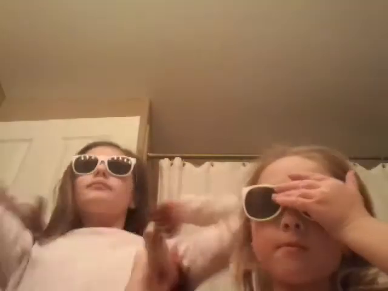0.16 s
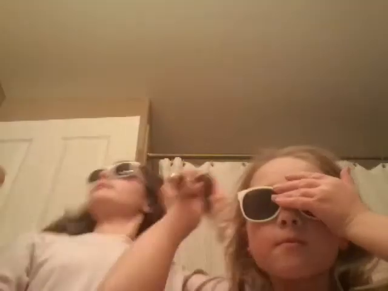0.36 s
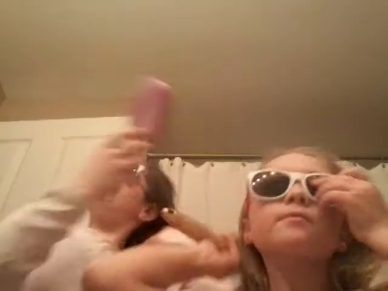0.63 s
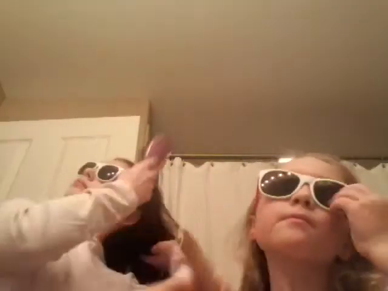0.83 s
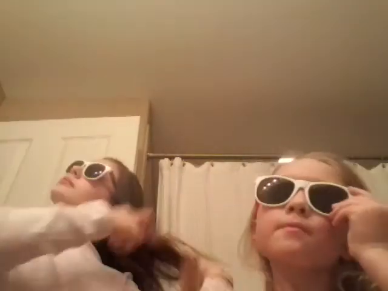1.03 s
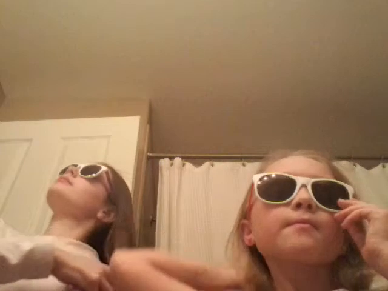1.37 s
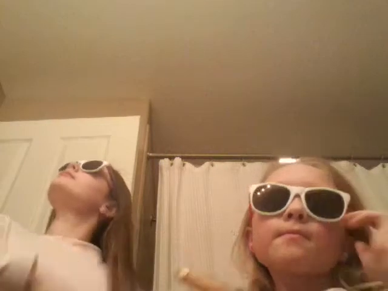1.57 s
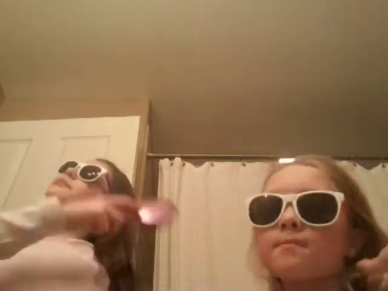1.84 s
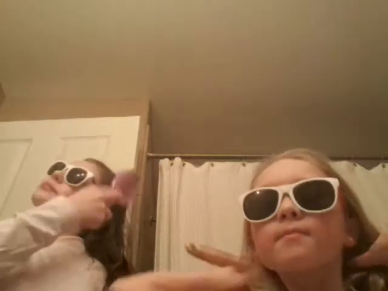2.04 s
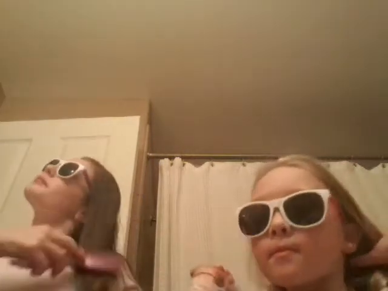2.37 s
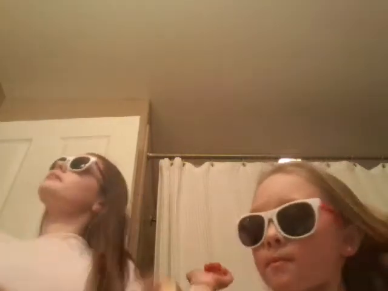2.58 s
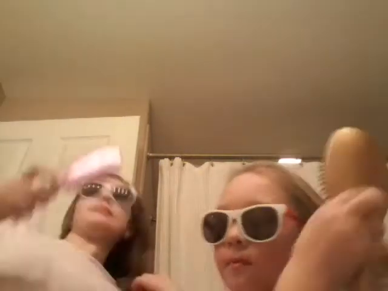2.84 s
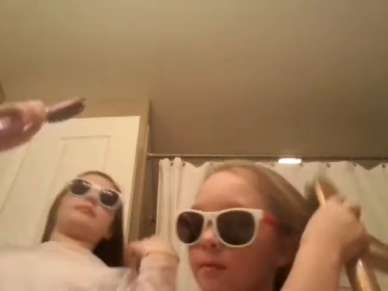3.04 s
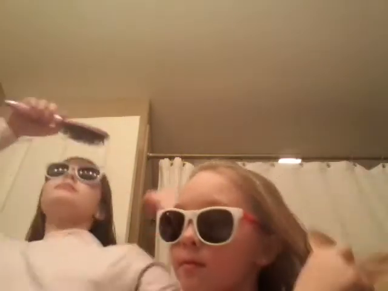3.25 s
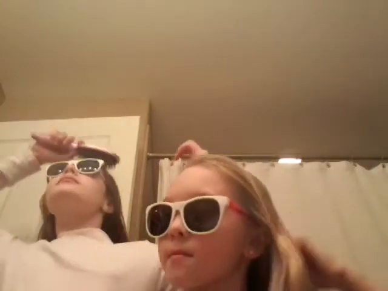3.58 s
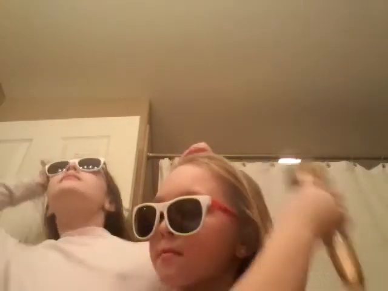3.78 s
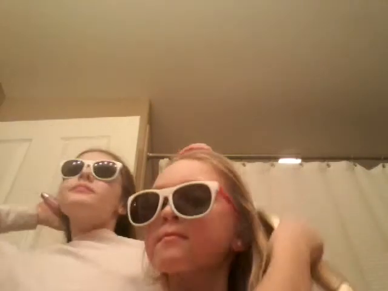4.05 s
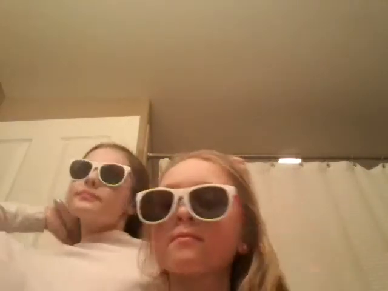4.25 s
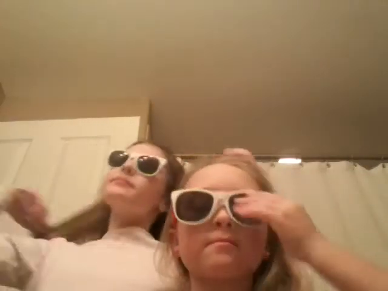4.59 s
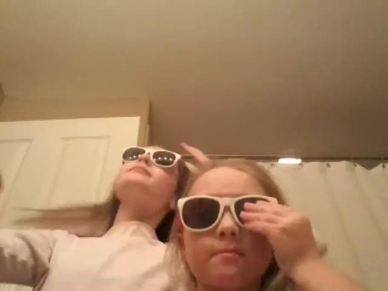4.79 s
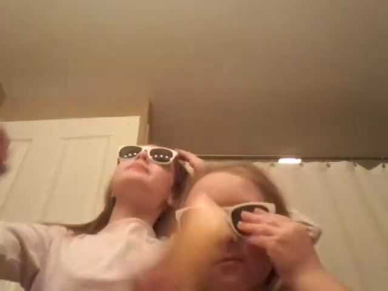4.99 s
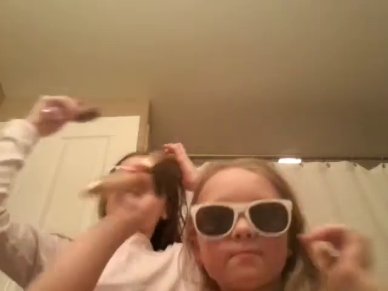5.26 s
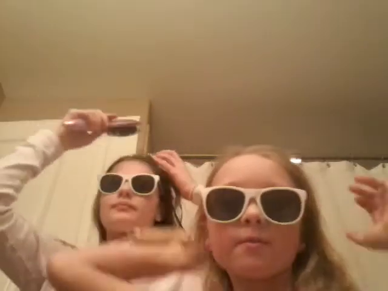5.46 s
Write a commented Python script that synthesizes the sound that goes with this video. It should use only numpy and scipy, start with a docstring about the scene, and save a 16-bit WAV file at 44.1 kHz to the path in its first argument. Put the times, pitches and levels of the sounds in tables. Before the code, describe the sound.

In a small hard-walled bathroom, a hollow bump opens abruptly, followed by hissing brush strokes, sharp bristle ticks and a crackly burst. Sleeves rub and handles knock close to a small built-in microphone. A hard plastic snap echoes, then strokes grow quieter until a second rattling bump. It ends in faint brushing over a low fan hum.

```python
"""In a small hard-walled bathroom, two people brush their hair close to a small built-in microphone.
Bristle slips, made of dense random clicks, hiss through the hair and ring hollow brush backs; sleeves rub.
Single bristles snag and tick, hands and handles knock softly: short decaying rings with noise around them.
A brush snaps once against something hard and the counter is bumped twice: noise bursts, rings and room echo.
A fan hums faintly: a wavering sine over coloured noise."""
import sys
import numpy as np
from scipy import signal
from scipy.fft import rfft, irfft
from scipy.io import wavfile

SR = 44100
rng = np.random.default_rng(int(sys.argv[2]) if len(sys.argv) > 2 else 0)


def wav_out(sig):
    """Save sig, one row per channel (or a flat mono array), as 16-bit PCM at SR to the path in sys.argv[1]."""
    wavfile.write(sys.argv[1], SR, np.round(np.clip(np.atleast_2d(sig).T, -1, 1) * 32767).astype(np.int16))


N = 248711

# The tones in which the counter and room ring. Each row: pitch in Hz, time to die away by 60 dB in seconds,
# relative level in dB in the first bump, relative level in dB in the second bump.
COUNTER_MODES = [(94.4, 0.54, -17, -14.5), (59.6, 0.89, -26, -41), (121.56, 0.34, 4, -8),
                 (127.4, 0.57, 0, -14.5), (193.1, 0.37, -14, -1), (210, 0.54, -8, -10.5),
                 (256.4, .4, -8, -7), (295.4, 0.49, -17, -17.5), (304.6, 0.45, -8.5, -7),
                 (377.5, 0.33, -6.5, -2.5), (472, 0.34, -36, -16.5), (466, .33, -9, -5.5),
                 (555, 0.16, -14, -6), (601, 0.17, -17, -7), (772, 0.23, -21.5, -17)]


def amp(db):
    """Turn dB into a plain gain."""
    return 10 ** (np.asarray(db) / 20)


def rms_one(x):
    """Scale a signal to an average strength (rms) of 1."""
    return x / np.sqrt(np.mean(x ** 2) + 1e-20)


def at_hz(points, hz):
    """Read a table of (Hz, value) between its points, on a log-frequency axis."""
    table_hz, values = np.transpose(points)
    return np.interp(np.log(hz), np.log(table_hz), values)


def drift(rate_hz):
    """Slow random wander of rms 1: noise smoothed by two equal poles, worked out every 40 samples."""
    pole = np.exp(-80 * np.pi * rate_hz / SR)
    noise = rng.standard_normal(N // 40 + 2002)
    slow = signal.lfilter([1], [1, -2 * pole, pole * pole], noise)[2000:]  # skip the filter's start
    return np.interp(np.arange(N) / 40, np.arange(len(slow)), rms_one(slow))


def colour(x, spectrum):
    """Weight each frequency of a signal by a spectrum table, then scale to rms 1."""
    hz = np.maximum(np.fft.rfftfreq(len(x), 1 / SR), 1)
    return rms_one(irfft(rfft(x) * amp(at_hz(spectrum, hz)), len(x)))


def grains(per_s, spread_db):
    """Many tiny clicks at random moments and of uneven size, like bristles slipping; rms 1."""
    boost_db = spread_db * np.minimum(rng.exponential(1, N), 5)
    sizes = amp(boost_db) * rng.standard_normal(N)
    return rms_one(sizes * (rng.random(N) < per_s / SR))


def resonate(x, hz, width_hz):
    """Pass a signal through one resonance, with gain 1 at its peak."""
    return signal.lfilter(*signal.iirpeak(hz, hz / width_hz, fs=SR), x)


def ring(hz, t60, size, rise=0.00017, hold=0.):
    """One struck tone: a sine of height about 1 that rises fast, may be held, then dies away evenly in dB."""
    t = np.arange(size) / SR
    decay = amp(-60 * np.maximum(t - hold, 0) / t60)
    return np.sin(2 * np.pi * hz * t) * decay * (1 - np.exp(-t / rise))


def echo_tail(spectrum, size, rise, hold=0.):
    """Blurred room echo: noise in third-octave bands, each dying at the room's rate; rms about 1 before decay."""
    # How long the room echoes. Each row: frequency in Hz, time to die away by 60 dB in seconds.
    room_t60 = [(40, 0.78), (120, 0.51), (260, 0.44), (700, 0.38), (1840, 0.34), (4850, 0.26),
                (12800, 0.22)]
    t = np.arange(size) / SR
    hz = np.maximum(np.fft.rfftfreq(size, 1 / SR), 1)
    noise = rfft(colour(rng.standard_normal(size), spectrum))
    out = np.zeros(size)
    for centre in 30 * 2 ** np.arange(0, 9.4, 1 / 3):
        share = np.clip(1 - np.abs(3 * np.log2(hz / centre)), 0, 1)  # neighbouring bands overlap
        decay = amp(-60 * np.maximum(t - hold, 0) / at_hz(room_t60, centre))
        out += irfft(noise * share, size) * decay
    return out * (1 - np.exp(-t / rise))


def add(out, s, x):
    """Mix x into out, starting at s seconds."""
    i = round(s * SR)
    out[i:i + len(x)] += x[:N - i]


def swells(rows):
    """Rise to each row's loudest moment and fall again, evenly in dB; powers add. One gain per level column."""
    fade_db = 20  # rise and fall times are counted over this many dB
    t = np.arange(0, N + 64, 64) / SR
    s, rise, fall, *levels_db = np.transpose(rows)[:, :, None]
    shape = amp(-fade_db * np.maximum((s - t) / rise, (t - s) / fall))
    gains = []
    for db in levels_db:
        total = np.sqrt(np.sum((amp(db) * shape) ** 2, axis=0))
        gains.append(np.interp(np.arange(N) / SR, t, total))
    return gains


def background():
    """Fan air and microphone hiss as coloured noise, plus a motor hum that wavers in pitch and level."""
    # Overall level, sinking throughout. Each row: time in seconds, level in dB.
    level_curve = [(0, -57.5), (1.5, -61), (4.2, -63), (4.8, -65), (5.64, -66)]
    # Colour of fan air and microphone hiss. Each row: frequency in Hz, relative level in dB.
    air_colour = [(12, -26.5), (20, -10), (49, -16), (100, -4.5), (122, -0.5), (175, -12), (427, -16),
                  (580, -12.5), (685, -10), (809, -13.5), (930, -16), (2330, -18), (3640, -16.5),
                  (15400, -26)]
    hum_hz, hum_db, hum_waver_db = 121.7, -1, 1  # hum height is relative to the rms of the air
    pitch_hz = hum_hz + 0.47 * drift(3.4)
    hum = np.sin(2 * np.pi * np.cumsum(pitch_hz) / SR) * amp(hum_db + hum_waver_db * drift(5))
    air = colour(rng.standard_normal(N), air_colour)
    times, levels_db = np.transpose(level_curve)
    return amp(np.interp(np.arange(N) / SR, times, levels_db)) * (air + hum)


def bumps():
    """Each bump rings the counter's tones, rumbles through the room and rattles what stands on it."""
    # Each row: start in seconds, ring level in dB, rumble level in dB, clatter level in dB,
    # time the ring and rumble are held before dying away in seconds.
    bump_rows = [(0.0, -13.5, -19.5, -27, 0.017), (4.3205, -15.5, -16.5, -18, 0.064)]
    # Colour of the low rumble. Each row: frequency in Hz, relative level in dB.
    rumble_colour = [(15, -67), (25, -33), (59, -23), (119, -10), (162, -0.5), (189, -10.5), (224, -1.5),
                     (375, -3), (528, -5), (565, -17.5), (637, -13), (1500, -25), (1950, -55.5),
                     (3300, -120)]
    # Colour of the rattling things. Each row: frequency in Hz, relative level in dB.
    clatter_colour = [(530, -38), (900, -19.5), (1130, -2), (1240, -13), (1770, -3.5), (2090, -6),
                      (2500, -7), (4330, -11), (5890, -3), (15400, -48)]
    clatter_delay_s = .0055
    out, t = np.zeros(N), np.arange(900) / SR
    for k, (s, ring_db, rumble_db, clatter_db, hold) in enumerate(bump_rows):
        for j, (hz, t60, *mode_db) in enumerate(COUNTER_MODES):
            tone = ring(hz, t60, size=36000, rise=0.0039, hold=hold)
            add(out, s, (-1) ** j * amp(ring_db + mode_db[k]) * tone)  # every other tone is upside down
        add(out, s, amp(rumble_db) * echo_tail(rumble_colour, size=36000, rise=0.00293, hold=hold))
        # a weak first touch, then the loose things land with a crack
        add(out, s, amp(clatter_db - 11) * echo_tail(clatter_colour, size=26000, rise=.0005))
        landing = s + clatter_delay_s
        add(out, landing, amp(clatter_db) * echo_tail(clatter_colour, size=26000, rise=0.0009))
        bright_noise = np.diff(rng.standard_normal(901))  # differences favour the treble
        add(out, landing, amp(clatter_db - 17) * bright_noise * t / 0.0011 * np.exp(1 - t / 0.0015))
    return out


def strokes():
    """Bristle slips hiss in the hair, crackle in a hollow brush and scratch; hands and sleeves rub below."""
    # Hiss swells: brush strokes, the dying hiss after the first bump, and the tails of snags.
    # Each row: loudest moment in seconds, rise in seconds, fall in seconds, hiss level in dB,
    # crackling brush ring level in dB.
    hiss_rows = [(.1, .3, 0.28, -49.5, -56.5), (.27, .12, 0.15, -50, -67), (.454, .2, 0.35, -52.5, -65.5),
                 (.59, 0.035, 0.23, -49, -59), (.646, 0.076, 0.1, -48, -42), (.704, 0.15, 0.05, -44, -44),
                 (.922, 0.054, 0.63, -56, -72), (1.37, 0.16, .24, -60, -70), (1.586, 0.094, 0.13, -47, -71),
                 (1.654, 0.027, .2, -48, -75.5), (1.99, .012, .1, -55, -66),
                 (2.058, 0.041, 0.076, -51, -72), (2.152, 0.0092, 0.1, -55, -74),
                 (2.61, 0.64, 0.12, -51.5, -70), (2.8, 0.023, .9, -64.5, -87),
                 (3.1, 0.66, 0.12, -62.5, -72), (3.242, 0.021, .06, -57.5, -82),
                 (3.394, 0.067, 0.15, -53, -67), (3.678, 0.52, .9, -63.5, -71),
                 (3.91, 0.049, 0.149, -60, -81), (4.154, 0.014, 0.042, -41, -63),
                 (4.3, 0.5, .05, -58.5, -76.5), (4.52, .2, 0.05, -50.5, -61.5), (4.626, .3, 0.1, -52, -70),
                 (5.13, .012, 0.23, -68, -81), (5.24, 0.29, 0.041, -66, -84.5),
                 (5.43, .012, 0.14, -70, -82.5), (5.63, 0.12, .2, -68, -77)]
    # Hands and sleeves. Each row: loudest moment in seconds, rise in seconds, fall in seconds,
    # scratch level in dB, sleeve rub level in dB, deep rub level in dB.
    handling_rows = [(.3, 0.59, .12, -59, -54.5, -53.5), (.5, .17, 0.072, -66, -61, -60),
                     (.698, 0.29, 0.12, -52.5, -50, -58), (.952, 0.032, 0.058, -50, -47.5, -51),
                     (1.05, 0.25, .14, -62, -55, -49), (1.318, 0.22, 0.33, -63, -54.5, -58),
                     (1.618, .11, 0.056, -43, -37, -45), (1.67, 0.13, 0.11, -53.5, -45.5, -51.5),
                     (2.038, 0.023, 0.24, -64, -58, -57.5), (2.42, 0.49, 0.24, -69, -57.5, -67),
                     (2.516, 0.059, 0.1, -46, -42.5, -66), (2.566, 0.063, 0.16, -53, -52.5, -53.5),
                     (2.78, 0.2, 0.58, -85, -81, -69), (3.092, 0.43, .07, -81, -64, -74.5),
                     (3.242, 0.021, 0.045, -61, -64.5, -73), (3.45, 0.17, .07, -64, -55, -77),
                     (3.554, 0.14, 0.19, -69, -63.5, -64), (3.68, .08, 0.26, -63.5, -56.5, -57.5),
                     (3.89, .6, 0.1, -67, -58, -81), (4.05, 0.17, 0.14, -88.5, -74, -66),
                     (4.18, 0.14, 1, -64, -59.5, -73), (4.72, .6, 0.053, -64.5, -65.5, -68),
                     (5.432, 0.038, 0.091, -74, -65, -66.5), (5.604, 0.13, 0.073, -68, -67, -72)]
    # Colour of the hiss. Each row: frequency in Hz, relative level in dB.
    hiss_colour = [(1470, -26.5), (2500, -5.5), (2740, -21.5), (3390, -5.5), (4360, -4.5), (6140, 1.5),
                   (8860, -15.5), (14900, -15.5), (15400, -13)]
    # Colour of rubbing cloth. Each row: frequency in Hz, relative level in dB.
    rub_colour = [(59, -47.5), (100, -10), (260, -3), (336, -15), (387, 0.5), (454, -5.5), (569, -2.5),
                  (683, -17), (728, -8), (1300, -9.5), (1690, -47), (2860, -120)]
    crackle_hz, crackle_width_hz = 2830, 520  # hollow back of one brush
    hiss_gain, crackle_gain = swells(hiss_rows)
    scratch_gain, rub_gain, deep_gain = swells(handling_rows)

    hiss = colour(grains(8000, spread_db=0.0), hiss_colour) * hiss_gain * amp(1.5 * drift(25))
    crackle = grains(2500, spread_db=3.0)
    for _ in range(2):  # twice through the same resonance
        crackle = resonate(crackle, crackle_hz, crackle_width_hz)
    scratch_band = signal.butter(2, [800, 2600], "band", fs=SR, output="sos")
    scratch = signal.sosfilt(scratch_band, grains(2500, spread_db=0.0))

    # the rubbing is heard partly through the tones of counter and room, from the fifth on
    cloth = colour(grains(990, spread_db=1.0), rub_colour)
    through_counter = sum(resonate(cloth, hz, width_hz=36) for hz, *rest in COUNTER_MODES[4:])
    cloth = cloth + amp(2.5) * through_counter
    rub = signal.sosfilt(signal.butter(3, 330, "high", fs=SR, output="sos"), cloth)
    deep = signal.sosfilt(signal.butter(3, 330, fs=SR, output="sos"), cloth)
    layers = (crackle, crackle_gain), (scratch, scratch_gain), (rub, rub_gain), (deep, deep_gain)
    return hiss + sum(rms_one(x) * gain for x, gain in layers)


def snags():
    """A bristle lets go: a crack, a short rough ring, a ping, a dull knock and a puff of room echo."""
    # Each row: start in seconds, level in dB, ring pitch in Hz, rough ring level against the crack in dB.
    snag_rows = [(0.1534, -37, 5230, 9), (0.265, -42, 6040, 2), (0.408, -42, 5330, 8),
                 (0.446, -38.5, 5250, 10.5), (0.5792, -36.5, 2730, 12), (0.617, -31.5, 2850, 9),
                 (0.646, -26, 6180, 13), (0.6648, -29, 2840, 12), (0.673, -30, 2850, 3),
                 (0.6916, -18, 2820, 8), (0.7114, -38, 2800, 11), (0.7305, -30, 6070, 3),
                 (0.916, -43, 5630, 11), (0.9473, -41.5, 5300, 15), (1.5848, -28, 5500, 10.5),
                 (1.6517, -27.5, 6100, 4.5), (1.6845, -34, 6600, 5), (1.991, -35, 5600, 2),
                 (2.037, -44, 5900, 0), (2.0596, -33.5, 5450, 0), (2.152, -36.5, 6850, 1),
                 (2.367, -43.5, 6030, 13.5), (2.5094, -38.5, 1830, 23), (2.533, -36.5, 1500, 18.5),
                 (2.804, -42.5, 5960, 4), (3.0996, -47.5, 5320, 10), (3.2356, -45.5, 6000, 9),
                 (3.3886, -35.5, 2990, 10.5), (3.9125, -40.5, 5980, 3), (4.142, -42.5, 2800, 14),
                 (4.149, -34, 2870, 14), (4.162, -30, 2820, -6), (5.133, -47, 6200, 4),
                 (5.2394, -53, 5540, 1)]
    port_hz, port_width_hz = 6330, 3500  # resonance of the microphone port
    rise_s, t60_s, knock_db = .0004, .013, -25
    out, t = np.zeros(N), np.arange(9000) / SR
    noise = rng.standard_normal((len(snag_rows), 9000))
    # a quick decay, then a weaker and slower one for the room
    dying = amp(-15.5 - 60 * t / t60_s) + amp(-27 - 60 * t / 0.18)
    dying = dying * (1 - np.exp(-t / rise_s))
    knock = amp(knock_db) * ring(390, 0.061, size=9000, rise=0.00052)
    for (s, db, hz, ring_db), white in zip(snag_rows, noise):
        through_port = resonate(resonate(white, port_hz, port_width_hz), port_hz, width_hz=7900)
        crack = rms_one(through_port + amp(-30) * white)
        rough = crack + amp(ring_db) * rms_one(resonate(white, hz, width_hz=130))
        ping = ring(hz, 0.0042, size=9000)
        add(out, s, amp(db) * (rough * dying + ping + knock))
    return out


def pulls():
    """Long even pulls: dense bristle slips make a brush back ring smoothly through its resonance."""
    # Each row: start in seconds, end in seconds, fade in seconds, level at the start in dB,
    # level at the end in dB, resonance in Hz, its width in Hz.
    pull_rows = [(0.165, .57, 0.019, -58.5, -58.5, 2300, 335), (2.363, 2.703, 0.04, -62, -56, 2405, 190),
                 (2.835, 3.171, 0.026, -65, -64, 2260, 110), (4.07, 4.323, 0.062, -61.5, -58, 2380, 300),
                 (4.536, 4.675, 0.05, -47.5, -54, 2370, 900)]
    out, t = np.zeros(N), np.arange(N) / SR
    slips = grains(4000, spread_db=1.5) * amp(1.4 * drift(9.1))
    for start, end, fade, start_db, end_db, hz, width_hz in pull_rows:
        gate = np.clip(np.minimum(t - start, end - t) / fade, 0, 1)
        ringing = rms_one(resonate(resonate(slips, hz, width_hz), hz, width_hz=2100))
        out += ringing * gate * amp(np.interp(t, [start, end], [start_db, end_db]))
    return out


def knocks():
    """A soft knock of a hand or handle: a short low ring with a rough skirt of noise around its pitch."""
    # Each row: start in seconds, level in dB, ring pitch in Hz.
    knock_rows = [(0.647, -40, 273), (0.699, -41.5, 260), (0.947, -40, 390), (1.012, -36, 383),
                  (1.028, -35, 230.4), (1.07, -39.5, 229), (1.269, -45, 189), (1.306, -46, 562),
                  (1.527, -48, 470), (1.585, -36, 386), (1.619, -32.5, 587), (1.636, -33.5, 255),
                  (1.669, -36.5, 256.5), (2.037, -54, 416), (2.503, -35.5, 559), (2.537, -39, 419),
                  (2.549, -42, 564), (2.899, -55.5, 597), (3.39, -45, 433), (3.429, -48, 468),
                  (3.527, -45, 431)]
    t60_s = 0.16
    out, t = np.zeros(N), np.arange(9000) / SR
    noise = rng.standard_normal((len(knock_rows), 9000))
    for (s, db, hz), white in zip(knock_rows, noise):
        skirt = rms_one(resonate(resonate(white, hz, width_hz=260), hz, width_hz=260))
        skirt = skirt * amp(-13.5 - 60 * t / t60_s) * (1 - np.exp(-t / 0.0099))
        add(out, s, amp(db) * (ring(hz, t60_s, size=9000, rise=0.0058) + skirt))
    return out


def snap():
    """A hard plastic click, its first echoes off near walls, then the blurred echo tail of the room."""
    # The click and its first wall echoes. Each row: time in seconds, relative level in dB.
    arrivals = [(1.7645, -2), (1.7705, -3), (1.7738, -2), (1.7785, -8)]
    # Colour of the click. Each row: frequency in Hz, relative level in dB.
    click_colour = [(140, -51), (240, -19), (457, -23.5), (626, -5.5), (918, -24), (1060, -10), (1370, -32),
                    (1580, -19), (1980, -16), (3900, -14.5), (6140, 2.5), (7300, -12), (15400, -41.5)]
    tail_db = -11.5
    out, t = np.zeros(N), np.arange(1200) / SR
    swell = t / .0007 * np.exp(1 - t / .0007)  # peaks after 0.7 ms
    for (s, db), white in zip(arrivals, rng.standard_normal((len(arrivals), 1200))):
        crack = amp(-28.5 - 60 * t / 0.008) * white  # the broad edge of the contact
        add(out, s - .001, amp(db - 5) * (colour(white, click_colour) * swell + crack))
    add(out, arrivals[0][0], amp(tail_db) * echo_tail(click_colour, size=26000, rise=0.0079))
    return signal.sosfilt(signal.butter(2, 220, "high", fs=SR, output="sos"), out)


def scene():
    """Add all sources at one microphone."""
    return (background() + bumps() + strokes() + snags() + pulls() + knocks() + snap())[None]


def record(dry):
    """Round off the peaks, add the converter's small steady offset and cut the top of the treble."""
    cutoff_hz, offset = 15600, -.0003  # offset as it enters the filter
    rounded = .9 * np.tanh(dry / .9) + offset
    return signal.sosfilt(signal.ellip(10, .5, 60, cutoff_hz, fs=SR, output="sos"), rounded)


dry = scene()
out = record(dry)
wav_out(out)
```